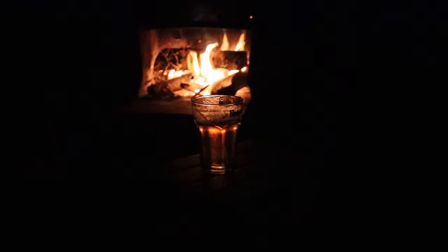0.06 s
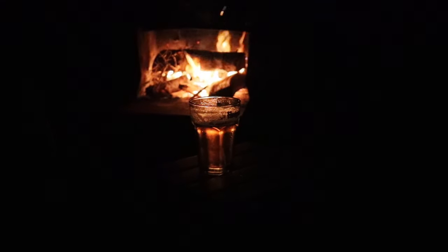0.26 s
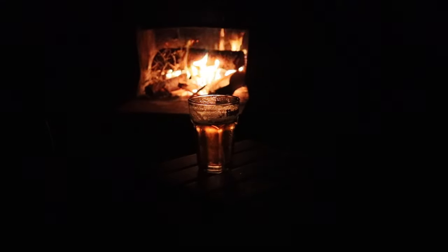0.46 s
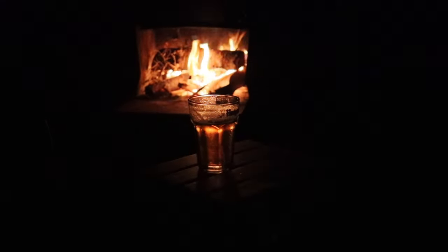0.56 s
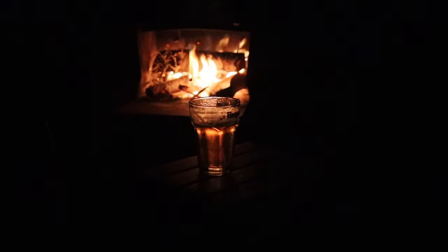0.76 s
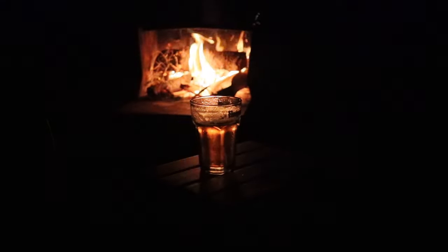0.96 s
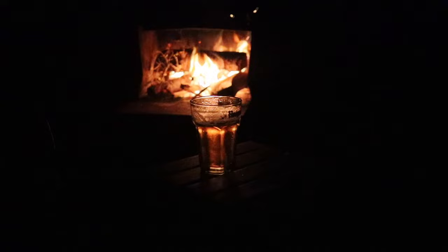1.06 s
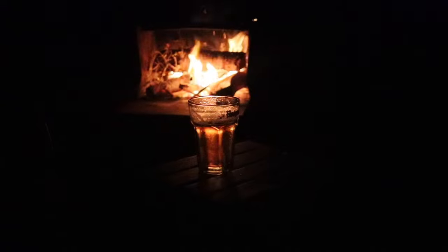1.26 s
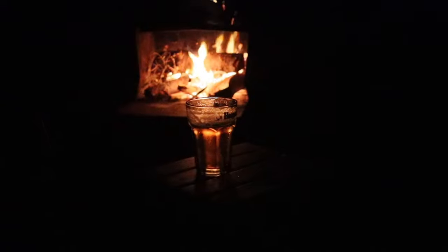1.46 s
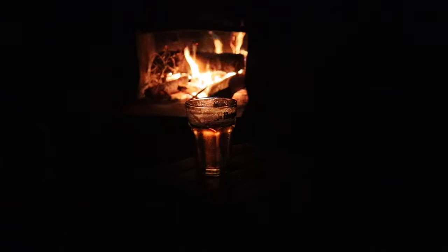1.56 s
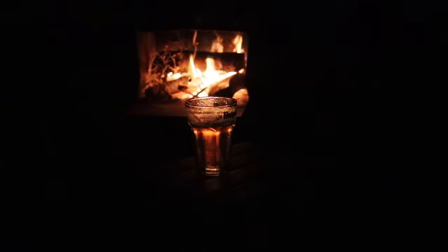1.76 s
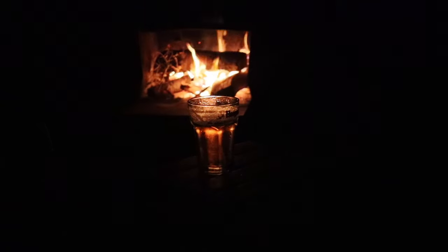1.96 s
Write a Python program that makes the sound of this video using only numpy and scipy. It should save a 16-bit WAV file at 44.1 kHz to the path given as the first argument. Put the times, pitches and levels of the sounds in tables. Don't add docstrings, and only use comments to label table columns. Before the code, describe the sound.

A wood fire crackles with sharp irregular pops and small snaps over a very faint hiss.

```python
import sys
import numpy as np
from scipy import signal
from scipy.fft import rfft, irfft
from scipy.io import wavfile
from scipy.ndimage import uniform_filter1d

SR = 44100
rng = np.random.default_rng(int(sys.argv[2]) if len(sys.argv) > 2 else 0)


def volts_from_decibels(level):
    exponent = np.asarray(level, float) / 20
    return 10 ** exponent


def transcribe(signal):
    frames = np.atleast_2d(signal).T
    limited = np.clip(frames, -1, 1)
    pcm = np.round(limited * 32767).astype(np.int16)
    wavfile.write(sys.argv[1], SR, pcm)


N = 88200


def evened(x):
    return x / np.sqrt(np.mean(x ** 2) + 1e-20)


def read(points, hz):
    f, value = np.transpose(points)
    return np.interp(np.log(hz + 1), np.log(f + 1), value)


def add(mix, s, sound):
    part = mix[round(s * SR):][:len(sound)]
    part += sound[:len(part)]


# (peak [dB], after-cracks [dB], spread of mode starts [s], tail brightness [0-1], room [dB])
POPS = [
    (-1.7, -7, 0.0012, 0.23, 4.5),
    (-18, -9, .001, .17, 0),
    (-10, -14, 0.00028, 0.3, 3),
    (-16.5, -8.5, 0.00051, 0.4, 3),
    (-8, -10, 0.000594, 0.86, 5),
    (-13, -6, 0.0012, 0.13, 5),
]
POP_S = [.2262, .2373, .9129, .9196, 1.2196, 1.3662]
POP_EDGE_DB = [-14, -20, 2, -8, -12, -14]
# (frequency [Hz], width [Hz], level [dB])
LOG_A = [(830, 400, 0), (2040, 280, -1), (2540, 300, -7), (3350, 300, -7), (4307, 450, -4), (5100, 600, -7),
         (5900, 500, -10), (7300, 400, -7), (8620, 330, -3), (9430, 320, -8), (10810, 330, -12),
         (12200, 500, -9.5), (14050, 450, -2), (14900, 500, -14)]
LOG_B = [(940, 200, -4.5), (2130, 240, 0), (3030, 180, -3), (4190, 310, -7), (5050, 250, -2),
         (5930, 250, -10), (6870, 310, -12), (8100, 300, -5), (9100, 280, -8), (10100, 340, -14.5),
         (12400, 520, -17.5), (13400, 340, -14)]
LOG_C = [(1800, 800, -12.5), (2900, 500, -9), (3670, 330, -10), (4490, 240, -6), (5630, 270, -9),
         (6210, 280, -9), (7100, 250, -10), (7800, 420, -4.5), (8500, 320, -0.5), (9260, 450, -6),
         (10300, 500, -12), (12100, 650, -11), (13700, 700, -13), (15300, 390, -14)]
LOG_D = [(810, 300, 0), (1950, 240, -1.5), (3060, 190, -1), (4070, 760, -1), (5390, 250, -5.5),
         (6130, 220, -12), (7780, 440, -4.5), (8870, 590, -6.5), (9430, 150, -9.5), (10030, 340, -8),
         (12040, 470, -9.5), (12860, 290, -14), (14100, 260, -13)]
LOG_E = [(340, 260, -3), (1760, 450, 0), (2800, 500, -8), (3800, 700, -9), (5200, 800, -12),
         (8270, 400, -4), (9000, 330, -8), (12200, 500, -15), (13600, 600, -14), (14900, 700, -17)]
# (time [s], peak [dB], knock [dB], crack [dB], tick [dB])
SNAPS = [(0.0751, -26.5, -1.5, 3.5, 2), (0.304, -39.5, 2.5, -11, -11), (0.4057, -43, 2, -7, 4),
         (0.4793, -45.5, 5, -7, -6), (0.5388, -44.5, 6, -16, -2), (0.5864, -33, 4.5, -5, -14),
         (0.5954, -29, -10, 2, -6), (0.6116, -41, -6, 3, 0), (0.657, -45.5, 0, -31, -26),
         (0.7832, -35.5, -14, -20, 8), (0.8417, -43, 0, -0.5, -20), (1.0137, -37.5, -11, -4, 7),
         (1.0693, -35.5, 0, 7, -0.5), (1.0837, -34.5, 6, -15, -28), (1.0892, -32.5, -2, -10, 2),
         (1.108, -33, 3, -13, -15),
         (1.1616, -26.5, 1, -2, 3.5), (1.19, -41, -21, -1, -5), (1.3213, -36.5, -5.5, -3, -5),
              (1.3943, -41, 5, -4, -12), (1.428, -25.5, -6, -3, 16), (1.4995, -39.5, 3, -9, -3.5),
              (1.6062, -40.5, -9, 0, -6), (1.613, -37, -22, -13, -10), (1.6745, -43, 3, -1, -19),
              (1.707, -23, -25, -10, 6), (1.7393, -25, -24, -6, 0), (1.7697, -39.5, -3.5, 0, -16),
              (1.7879, -33, -9, 0, -5.5), (1.8144, -41, -4, -4, -20), (1.8845, -42, -16, -1, 4),
              (1.9341, -44, -14, 10, 1), (1.95, -41.5, -6, 0, 0), (1.957, -49, 0, -6, 3),
              (1.967, -41, -20, -2, 0), (1.988, -33.5, -24, -3, 0), (1.9974, -42.5, 17, -2, -21)]
# (time [s], peak [dB], frequency [Hz])
THUMPS = [(.2266, -28, 565), (0.9197, -34, 329), (.9165, -37, 610), (1.1621, -42, 250),
          (1.1621, -32.5, 740), (1.49, -43.5, 254), (1.7399, -41, 255), (1.7392, -25, 4700),
          (0.2373, -36.5, 324), (1.7697, -39, 1330), (1.8146, -41.5, 1200), (2.2, -42, 1400),
          (1.9615, -45, 790), (1.3955, -39.5, 700)]


def crackle():
    out, puffs = np.zeros((2, N))
    dull_db_per_decade = -8.5
    rebound = [(hz, width, db + dull_db_per_decade * np.log10(hz / 1000)) for hz, width, db in LOG_A]
    logs = [LOG_A, rebound, LOG_B, LOG_E, LOG_C, LOG_D]
    for s, edge_db, row, log in zip(POP_S, POP_EDGE_DB, POPS, logs):
        peak_db, after_db, stagger_s, bright, room_db = row
        pop = burst(log, peak_db, edge_db, after_db, stagger_s)
        add(out, s, pop)
        add(puffs, s, volts_from_decibels(room_db) * np.linalg.norm(pop) * np.array([1, -bright]))
    faint_snaps = [(1.3, -40, -20, -7, 0), (.3115, -41, -25, -14, 0)]
    for s, *row in SNAPS + faint_snaps:
        pop = snap(*row)
        add(out, s, pop)
        puffs[round(s * SR)] = np.linalg.norm(pop)
    for s, *row in THUMPS:
        add(out, s, thump(*row))
    return out, puffs


def burst(modes, peak_db, edge_db, after_db, stagger_s):
    t = np.arange(900) / SR
    hz, width_hz, db = np.transpose(modes)[:, :, None]
    width_hz = np.maximum(width_hz, 330)
    since = np.maximum(t - stagger_s * rng.random(hz.shape), 0)
    decay = np.exp(-np.pi * width_hz * since)
    rings = -volts_from_decibels(db) * width_hz * decay * np.sin(2 * np.pi * hz * since)
    edge = np.diff(np.exp(-((t - .0001) / .00004) ** 2), prepend=0)
    parts = np.vstack([rings / abs(rings.sum(0)).max(), -volts_from_decibels(edge_db) * edge / abs(edge).max()])
    ring = parts.sum(0)

    count, spread_s, fall_db = 45, .0065, -33
    when, size = rng.random(count), rng.standard_normal(count)
    cracks = np.zeros(300)
    place = np.clip(8 + when * spread_s * SR, 0, 299).astype(int)
    np.add.at(cracks, place, size * volts_from_decibels(fall_db * when + after_db))
    blur_s = 0.00039
    after = np.convolve(ring * np.exp(-abs(t - stagger_s / 2) / blur_s), cracks)
    both = after + np.pad(ring, (0, len(cracks) - 1))

    power = abs(rfft(parts, 2048)) ** 2
    power = power * (power / power.max(1, keepdims=True)) ** .55
    both = recolour(both, power.sum(0))
    low_cut_hz = max(364, hz.min() / 2)
    out = signal.lfilter(*signal.butter(2, low_cut_hz, "high", fs=SR), both)
    return volts_from_decibels(peak_db) * out / abs(out).max()


def recolour(x, power):
    now = uniform_filter1d(abs(rfft(x, 2048)) ** 2, size=7)
    wanted = uniform_filter1d(power, size=7)
    cepstrum = irfft(np.log((wanted + 1e-9) / (now + 1e-3 * now.mean())) / 2)
    cepstrum = cepstrum * np.r_[1, 2 * np.ones(1023), 1, np.zeros(1023)]
    return irfft(rfft(x, 2048) * np.exp(rfft(cepstrum)))[:1200] * np.linspace(1, 0, 1200)


BAND_HZ = [800, 3000, 10000]
WOOD_HZ = [330, 760, 1350, 2000, 3000, 4300, 5400, 7200, 8600, 10300, 12200, 14100]


def snap(peak_db, *tone_db):
    detune, spread = rng.standard_normal((2, len(WOOD_HZ)))
    hz = np.array(WOOD_HZ) * (1 + 0.035 * detune)
    tilt_db_per_decade, thud_db = -6.5, -6
    db = read(np.transpose([BAND_HZ, tone_db]), hz) + 2 * spread
    db = db + tilt_db_per_decade * np.log10(hz / 3000) + thud_db * (hz < 500)
    width_hz = 210 + 0.084 * hz
    modes = np.transpose([hz, width_hz, db])
    edge_db = -7.5 + min(tone_db[2] - max(tone_db), 0)
    return burst(modes, peak_db, edge_db, after_db=-7, stagger_s=0.00046)


def thump(peak_db, hz):
    turns = np.arange(2000) / SR * hz
    decay_cycles = 0.66
    swell = np.e * turns * np.exp(-turns / decay_cycles) / decay_cycles
    return -volts_from_decibels(peak_db) * swell * np.sin(2 * np.pi * turns)


# (frequency [Hz], level [dB])
TAIL_TONE = [(200, 2), (800, 0), (1500, 1), (4000, 0), (8500, -1), (15500, -15.5), (16100, -44)]
# (frequency [Hz], t60 [s])
TAIL_T60 = [(200, 0.9), (800, 1), (3000, 0.33), (8000, 0.45), (15000, 0.5)]


def room(puffs):
    hz, t, z = signal.stft(rng.standard_normal(SR // 2), SR, nperseg=256)
    fade_db = read(TAIL_TONE, hz)[:, None] - 60 * t / read(TAIL_T60, hz)[:, None]
    tail = signal.istft(z * volts_from_decibels(fade_db), SR, nperseg=256)[1]
    rise_s = 0.0097
    tail = tail * np.minimum(np.arange(len(tail)) / SR / rise_s, 1)
    return volts_from_decibels(-24.5) * signal.fftconvolve(puffs, tail / np.linalg.norm(tail))[:N]


# (frequency [Hz], level [dB], t60 [s])
GRATE = [(650, -9, .6), (715, -9, .14), (766, -12, .5), (886, -11, .6), (992, -14, .6), (1640, -9, .16),
         (1820, -14, .15), (2120, -7, .09), (2260, -9, .1), (825, -14, .25), (1933, -10, 0.085),
         (2680, -9, .07), (3000, -9, .06)]


def grate():
    t, out = np.arange(SR // 2) / SR, np.zeros(N)
    hit_s, hit_db, rise_s = 1.367, -39, 0.0038
    for hz, db, t60_s in GRATE:
        waver = rng.standard_normal((2, len(t)))
        waver = uniform_filter1d(uniform_filter1d(waver, size=300), size=300)
        depth = min((hz / 1600) ** 2, 1.3)
        shake = 1 + depth * (evened(waver[0]) + 1j * evened(waver[1]))
        ring = (shake * np.exp(2j * np.pi * (hz * t + rng.random()))).real
        add(out, hit_s, volts_from_decibels(hit_db + db - 60 * t / t60_s) * ring * np.minimum(t / rise_s, 1))
    return out


def ticks():
    rate_hz = 74
    size = volts_from_decibels(3.9 * np.minimum(rng.exponential(1, N), 3)) * (rng.random(N) < rate_hz / SR)
    kind = rng.integers(0, 6, N)
    out = np.zeros(N)
    for k in range(6):
        out += signal.oaconvolve(size * (kind == k), snap(0, -6. * (k % 3), -5, -4))[:N]
    return volts_from_decibels(-69) * evened(signal.oaconvolve(out, signal.firwin(127, 15700, fs=SR), "same"))


# (frequency [Hz], density [dB per Hz])
FLAME = [(12, -10), (30, 5.5), (64, -8), (130, -6.5), (255, -5), (330, -11.5), (450, -20), (800, -82)]
# (time [s], level [dB])
SWELL = [(0.0, -55.5), (0.08, -64), (0.16, -59.5), (0.29, -63), (0.32, -54), (0.41, -69), (0.47, -53),
         (0.51, -62.5), (0.95, -55.5), (1.26, -63.5), (1.29, -58), (1.31, -66), (1.56, -56), (1.71, -70),
         (1.73, -59.5), (2.0, -61)]


def rumble():
    return volts_from_decibels(-57) * air(FLAME, patchy_db=.9, flicker_db=.4, swell=SWELL)


# (frequency [Hz], density [dB per Hz])
HISS = [(330, -7.5), (860, -3.5), (1500, -11), (3000, -14.5), (6300, -16), (8600, -13), (11500, -19.5),
        (15700, -18)]


def hiss():
    return volts_from_decibels(-57) * air(HISS, patchy_db=.6, flicker_db=.4)


# (frequency [Hz], density [dB per Hz])
SIDE_TONE = [(20, 7), (660, -4.5), (1030, -19.5), (16000, -26)]


def side_air():
    return volts_from_decibels(-80.5) * air(SIDE_TONE, patchy_db=2, flicker_db=1.5)


def air(tone, patchy_db, flicker_db, swell=((0, -60),)):
    frames, hz = N // 256 + 5, np.fft.rfftfreq(1024, 1 / SR)
    a, b, patches = rng.standard_normal((frames, 513, 3)).T
    patches = uniform_filter1d(uniform_filter1d(patches, size=12, axis=0), size=12, axis=1)
    flicker = evened(uniform_filter1d(rng.standard_normal(frames), size=5))
    surge_db = np.interp(np.arange(frames) * 256 / SR, *np.transpose(swell)) + 60
    field_db = read(tone, hz)[:, None] + patchy_db * evened(patches) + flicker_db * flicker
    field_db = field_db + np.outer(hz < 170, surge_db)
    z = (a + 1j * b) * volts_from_decibels(field_db) * ((hz > 12) & (hz < 15950))[:, None]
    return evened(signal.istft(z, nperseg=1024, noverlap=768)[1][:N])


def scene():
    fire, puffs = crackle()
    mid = fire + room(puffs) + grate() + ticks() + rumble() + hiss()
    side = side_air()
    return np.array([mid + side, mid - side])


def top_cut(x):
    return signal.sosfilt(signal.butter(12, 16990, fs=SR, output="sos"), x)


def record(dry):
    low_pass = signal.firwin(255, 16600, window=("kaiser", 9), fs=SR)
    mix = signal.oaconvolve(dry, low_pass[None], "same")
    return top_cut(mix)


dry = scene()
out = record(dry)
transcribe(out)
```